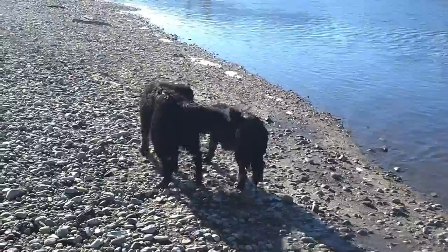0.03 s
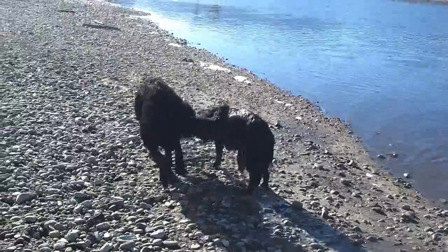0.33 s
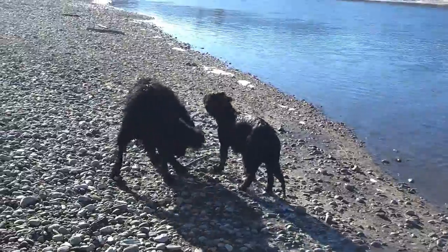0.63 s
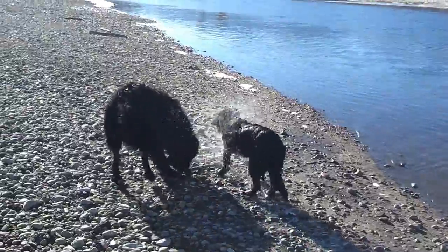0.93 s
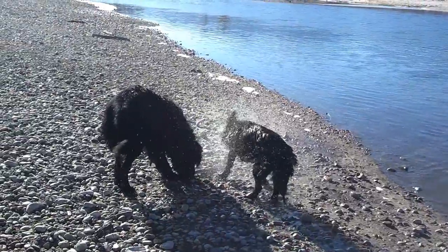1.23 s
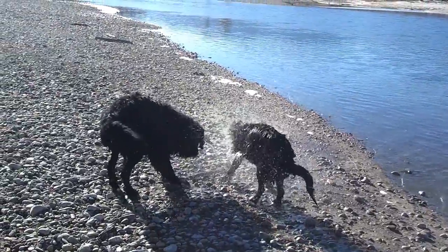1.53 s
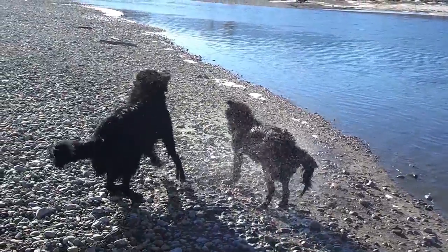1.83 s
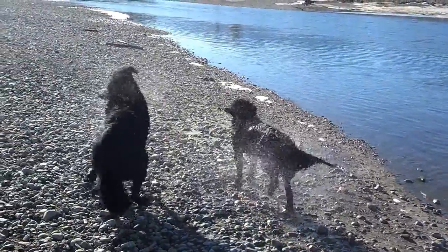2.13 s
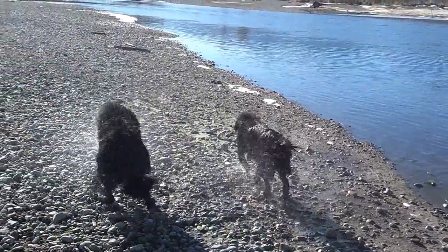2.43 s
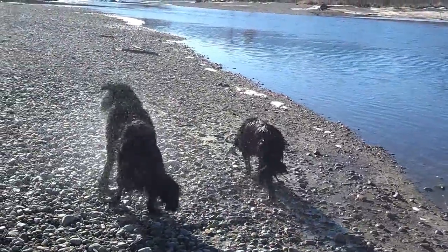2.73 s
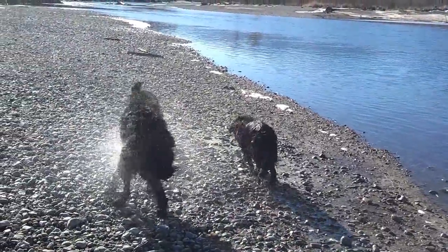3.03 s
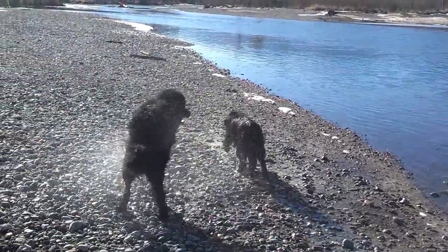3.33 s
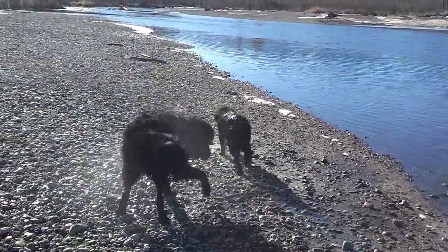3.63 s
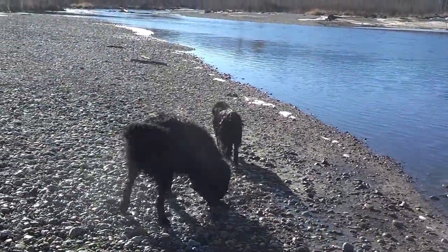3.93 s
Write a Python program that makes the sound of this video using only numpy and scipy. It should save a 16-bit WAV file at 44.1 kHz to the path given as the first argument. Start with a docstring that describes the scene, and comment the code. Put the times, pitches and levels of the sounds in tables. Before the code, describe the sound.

Two dogs shake out wet fur, spraying droplets onto pebbles that click under their paws.

```python
"""Spray patters and pebbles click, then wet fur swishes and slaps: two dogs shake themselves in turn
on a riverbank. Each whip of a coat throws a sheet of droplets, each a brief damped oscillation.
Paws set pebbles and the hollows under cobbles ringing, and a metal collar tag chinks in close modes.
Far engines drone over light wind and river noise; cross-subtraction widens two close microphone ports."""
import sys
import numpy as np
from scipy.fft import rfft, irfft, next_fast_len
from scipy.io import wavfile
from scipy.ndimage import map_coordinates

SR = 44100
rng = np.random.default_rng(int(sys.argv[2]) if len(sys.argv) > 2 else 0)


def wrap_up_sound(samples):
    """Save the sound to the file named by the first command line argument, as 16-bit audio."""
    columns = np.atleast_2d(samples).T
    # keep every value between -1 and 1, then stretch to whole-number steps
    tamed = np.clip(columns, -1, 1)
    steps = np.round(tamed * 32767).astype(np.int16)
    wavfile.write(sys.argv[1], SR, steps)


N = 176400
TOP_HZ = 15800  # upper band limit

# Gain at the two ports, left row then right: level/dB
PORT_GAINS = [
    [3],
    [-5],
]
# Spectral shape of wind and river: f/Hz, level/dB
AIR_SPECTRUM = [(50, -19), (80, 6.5), (150, 7.5), (600, 5), (1200, -9.5), (15000, -37)]
# Course of the engines: t/s, low engine level/dB, high engine level/dB, high engine rotation f/Hz
ENGINE_COURSE = [(0, -48.5, -49.5, 42.17), (.5, -49, -57.5, 43.57), (2.25, -49, -49, 42.61),
                 (2.55, -64, -55.5, 42.51), (3.3, -55, -46.5, 42.8)]
# Partials of the low engine: harmonic number, level/dB
LOW_HARMONICS = [(3, -10.5), (6, -4), (9, -11)]
# Partials of the high engine: harmonic number, level/dB
HIGH_HARMONICS = [(3, -4), (4, -3.5), (6, -10), (8, -12.5), (10, -12.5), (12, -10.5), (14, -13)]
# Spectral weighting of fine droplets: f/Hz, level/dB
DROPLET_SPECTRUM = [(400, -5), (1400, -5.5), (5000, -0.5), (12000, 3), (15000, 7.5)]
# Falling spray: t/s, drop level/dB, mist level/dB
SPRAY_LEVELS = [(0, -57.5, -48.5), (.47, -73, -63), (1.05, -53, -46.5), (1.33, -57, -50.5),
                (1.8, -52.5, -46), (2.3, -60.5, -47.5), (2.37, -59, -54.5), (2.93, -64.5, -52),
                (3.2, -50, -47), (3.33, -59.5, -52.5), (3.65, -56, -52.5), (3.76, -70, -56.5)]
# Loose cobbles rocking over hollows: t/s, level/dB, f/Hz, decay time/s
COBBLE_KNOCKS = [(.214, -30.5, 400, 0.0023), (.52, -34.5, 480, 0.0042), (1.076, -37.5, 990, .003),
                 (1.499, -30.5, 1040, 0.0027), (1.579, -34, 1140, 0.0018), (1.751, -36, 1030, 0.0053),
                 (2.268, -31, 686, 0.0025), (2.333, -30.5, 593, 0.0044), (2.686, -25, 391, 0.0024),
                 (2.77, -36.5, 680, 0.0023), (2.889, -28.5, 584, .0045), (3.004, -30.5, 676, 0.0047)]
# Pebbles clicking under paws: t/s, level/dB, f/Hz
PEBBLE_CLICKS = [(.103, -28.5, 3440), (.126, -35.5, 1910), (0.2248, -27.5, 8100), (0.378, -30.5, 3870),
                 (0.405, -24, 3400), (0.52, -33.5, 1600), (.82, -30, 2300), (.835, -25, 2300),
                 (.951, -26, 3430), (1.519, -24, 4600), (1.855, -28.5, 2300), (2.027, -26, 3220),
                 (2.111, -25.5, 6340), (2.6184, -33, 1820), (2.6855, -23, 7400), (2.89, -27, 3260),
                 (2.978, -28.5, 3970), (3.009, -31.5, 3600), (3.739, -20, 3400), (3.8265, -32, 3700)]
# Touches of the collar tag: t/s, level/dB, upper mode f/Hz
TAG_CHINKS = [(1.152, -31, 15300), (1.768, -33.5, 14600), (1.992, -34, 14500), (2.066, -36.5, 14500),
              (2.138, -40, 14920), (2.196, -35.5, 15000), (2.282, -35, 14800), (2.316, -29, 15100),
              (2.5362, -30, 14800), (2.7935, -33.5, 14900), (3.163, -41, 14900), (3.353, -44, 14900)]
# Whips of wet fur: t/s, duration/s, droplet sheet level/dB, splat level/dB
FUR_SWISHES = [(0.395, 0.019, -39.5, -47.5), (.901, 0.023, -38.5, -54), (.95, 0.023, -35, -49.5),
               (1.005, 0.0065, -35, -60), (1.135, 0.0051, -29.5, -37), (1.15, 0.014, -37, -50.5),
               (1.237, 0.033, -35.5, -45.5), (1.285, 0.0065, -32.5, -67), (1.384, 0.011, -36.5, -47.5),
               (1.632, 0.014, -35, -47.5), (1.721, 0.038, -40, -56), (1.881, 0.013, -31, -46),
               (2.308, .014, -37, -52), (2.33, 0.0094, -31.5, -65), (2.468, 0.017, -43.5, -51),
               (3.226, 0.025, -44, -50.5), (3.393, 0.049, -42.5, -58.5), (3.955, .01, -36, -46.5)]


def amp(db):
    """Amplitude ratio of a level in decibels."""
    return 10 ** (np.asarray(db) / 20)


def unit(x):
    """Normalisation to rms 1."""
    return x / np.sqrt(np.mean(x ** 2) + 1e-20)


def curves(rows):
    """Linear interpolation in time of each column after the first."""
    s, *cols = np.transpose(rows)
    return [np.interp(np.arange(N) / SR, s, c) for c in cols]


def wobble(rate):
    """Spline interpolation of random knots, rate per second."""
    knots = rng.standard_normal(int(N * rate / SR) + 4)
    return map_coordinates(knots, [np.arange(N) * rate / SR])


def filtered(x, response):
    """Linear filtering: the spectrum times a frequency response."""
    m = next_fast_len(x.shape[-1] + 8192)
    return irfft(rfft(x, m) * response(np.fft.rfftfreq(m, 1 / SR)), m)[..., :x.shape[-1]]


def coloured(x, points):
    """Spectral shaping by (f/Hz, level/dB) points, to rms 1."""
    f, db = np.transpose(points)
    return unit(filtered(x, lambda hz: amp(np.interp(np.log(hz + 1), np.log(f), db))))


def mode(hz, t):
    """Simple harmonic motion with random phase."""
    return np.sin(2 * np.pi * (hz * t + rng.uniform()))


def add(out, s, x):
    """Superposition of x on out, from s seconds."""
    i = max(0, round(s * SR))
    out[:, i:i + x.shape[-1]] += x[..., :N - i]


def wind_and_river(level_db=-53, side_db=-2):
    """Broadband noise, gently modulated; sum and difference spread it in stereo."""
    air = amp(1.2 * wobble(6)) * coloured(rng.standard_normal((2, N)), AIR_SPECTRUM)
    mid, side = air * amp([[0], [side_db]])
    return amp(level_db) * np.array([mid + side, mid - side])


def engine(hz, harmonics, level_db, drift=0.00392, fade_db=2, wander_rad=0.91):
    """Harmonics of a rotation rate, each fading and wandering in phase on its long path."""
    turn = 2 * np.pi * np.cumsum(hz * (1 + drift * wobble(3))) / SR
    out = np.zeros((2, N))
    for k, db in harmonics:
        gain = np.sqrt(2) * amp(db + fade_db * wobble(4.25))
        wander = wander_rad * np.array([wobble(5.205), wobble(4.88)])
        out += gain * np.sin(k * turn + wander)
    return amp(level_db) * out


def far_engines(low_hz=25.62):
    """Level differences place the low drone to the left and the high one to the right."""
    low_db, high_db, high_hz = curves(ENGINE_COURSE)
    low = engine(low_hz, LOW_HARMONICS, low_db) * amp([[1], [-1]])
    high = engine(high_hz, HIGH_HARMONICS, high_db) * amp([[-3], [3]])
    return low + high


def drops(count, centre_hz, octaves, cycles, spread_db):
    """Random impacts as damped sinusoids; the phase difference between ports grows with frequency."""
    t = np.arange(SR // 160) / SR
    pitch, strength, bearing = np.clip(rng.standard_normal((count, 3)), -2, 2).T[..., None]
    hz = np.minimum(centre_hz * 2 ** (octaves * pitch), SR / 2)
    fade = amp(spread_db * strength) * np.exp(-hz * t / cycles)
    shift = 2 * bearing * hz / TOP_HZ
    at = (rng.integers(0, N, (count, 1)) + np.arange(len(t))).ravel()
    ports = [fade * np.sin(2 * np.pi * hz * t + side * shift) for side in (1, -1)]
    return unit(np.array([np.bincount(at, rings.ravel(), N)[:N] for rings in ports]))


def droplets(count, hiss, cycles):
    """Fine droplets ring at high frequencies, ticking over a noise continuum."""
    ticks = drops(count, centre_hz=5938, octaves=0.929, cycles=cycles, spread_db=1)
    return coloured(ticks + hiss * rng.standard_normal((2, N)), DROPLET_SPECTRUM)


def spray(surge_db=2.53):
    """Big drops and fine mist strike the stones in quick surges, summing incoherently to a patter."""
    drops_db, mist_db = curves(SPRAY_LEVELS)
    surge = surge_db * wobble(45)
    patter = drops(count=3000, centre_hz=1172, octaves=0.69, cycles=2.9, spread_db=6)
    mist = amp(PORT_GAINS) * droplets(count=9000, hiss=0.78, cycles=12.3)
    return amp(drops_db + surge) * patter + amp(mist_db + surge) * mist


def cobbles(rise_s=0.00096, upper_db=-9, upper_ratio=1.896, scrape_db=-17, scrape_s=0.017):
    """Cavity resonance: a cobble tips, the hollow beneath rings in two modes, and sand scrapes."""
    out, t = np.zeros((2, N)), np.arange(SR // 20) / SR
    for s, db, hz, decay_s in COBBLE_KNOCKS:
        swell = (1 - np.exp(-(t / rise_s) ** 2)) * np.exp(-t / decay_s)
        ring = swell / swell.max() * (mode(hz, t) + amp(upper_db) * mode(upper_ratio * hz, t))
        sand = filtered(rng.standard_normal((2, len(t))), lambda f: f * hz / (hz ** 2 + f * f))
        scrape = unit(sand) * np.exp(-t / scrape_s)
        add(out, s, amp(db) * (ring + amp(scrape_db) * scrape))
    return out


def pebbles(ring_s=0.0027, crack_s=0.0007, crack_db=-10, grit_s=0.014, grit_db=-13, damping=0.39):
    """Impact excites a heavily damped resonance, with a crack and a little shifting grit."""
    out, t = np.zeros((2, N)), np.arange(SR // 20) / SR
    crack_fade = np.exp(-t / crack_s) + amp(grit_db) * np.exp(-t / grit_s)
    for s, db, hz in PEBBLE_CLICKS:
        burst = rng.standard_normal((2, len(t))) * np.exp(-t / ring_s)
        width_hz = damping * hz
        ring = filtered(burst, lambda f: 1j * f * width_hz / (hz ** 2 - f * f + 1j * f * width_hz))
        ring /= abs(ring).max(axis=1, keepdims=True)
        crack = rng.standard_normal((2, len(t))) * crack_fade
        add(out, s, amp(db) * (ring + amp(crack_db) * crack))
    return out


def collar_tag(ring_s=0.0089, attack_s=0.00051, low_hz=9400, detune_hz=90, split_hz=140):
    """Two pairs of close modes beat, damped and detuned by the coat, as the tag rasps on its ring."""
    out, t = np.zeros((2, N)), np.arange(SR // 10) / SR
    fade = (1 - np.exp(-t / attack_s)) * np.exp(-t / ring_s)
    pair = lambda hz: mode(hz, t) + amp(-8) * mode(hz + split_hz, t)
    for s, db, hz in TAG_CHINKS:
        rasp = amp(-12) * rng.standard_normal((2, len(t)))
        upper = pair(hz)
        lower = amp(-5) * pair(low_hz + detune_hz * rng.normal())
        add(out, s, amp(db) * fade * (upper + lower + rasp))
    return out


def wet_fur(attack_s=0.0015, release_s=0.0072, flutter_db=3):
    """Inertia throws a sheet of droplets off each whip of the coat; clumped hair adds a lower splat."""
    out, t = np.zeros((2, N)), np.arange(N) / SR
    sheet = droplets(count=6000, hiss=1, cycles=11.7)
    splat = drops(count=2500, centre_hz=2107, octaves=0.16, cycles=3.7, spread_db=4.5)
    for s, duration, sheet_db, splat_db in FUR_SWISHES:
        attack = np.clip((t - s) / attack_s, 0, 1)
        release = np.exp(-np.maximum(t - s - duration, 0) / release_s)
        out += attack * release * (amp(sheet_db) * sheet + amp(splat_db) * splat)
    return amp(flutter_db * wobble(160)) * out


def scene():
    """Superposition of all sources at the two ports."""
    dogs = amp(-1.5) * amp(PORT_GAINS) * (wet_fur() + pebbles() + collar_tag())
    return dogs + cobbles() + spray() + wind_and_river() + far_engines()


def record(dry, share=0.92, cross_hz=650, delay_s=15.85 / SR, wind_cut_hz=62):
    """Differential widening: each side loses the other's delayed treble; the band is then limited."""
    treble = lambda hz: share * hz ** 4 / (hz ** 4 + cross_hz ** 4)
    cross = filtered(dry[::-1], lambda hz: treble(hz) * np.exp(-2j * np.pi * hz * delay_s))
    passband = lambda hz: (hz < TOP_HZ) * hz ** 2 / np.hypot(hz ** 2, wind_cut_hz ** 2)
    return filtered(dry - cross, passband)


dry = scene()
out = record(dry)
wrap_up_sound(out)
```